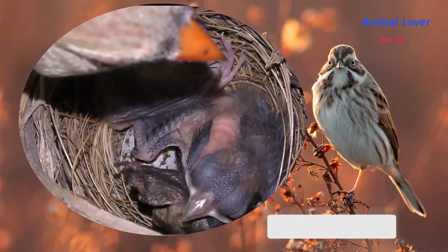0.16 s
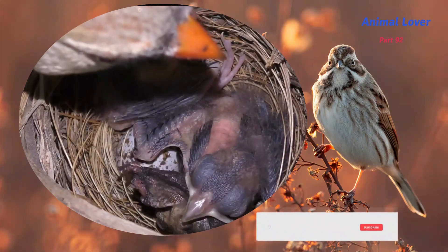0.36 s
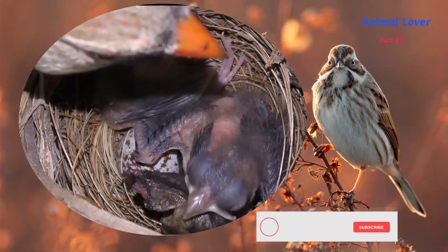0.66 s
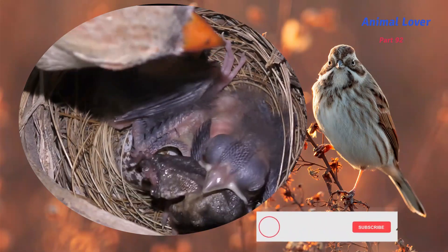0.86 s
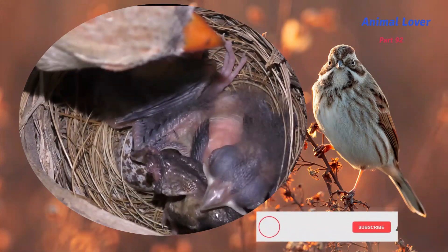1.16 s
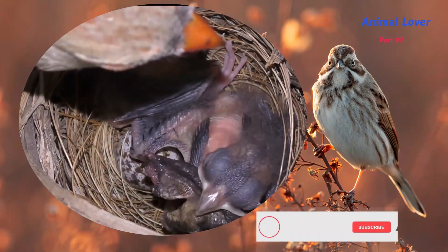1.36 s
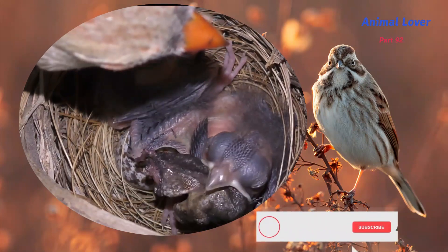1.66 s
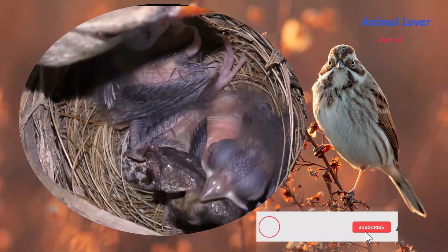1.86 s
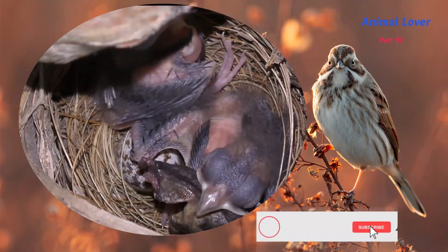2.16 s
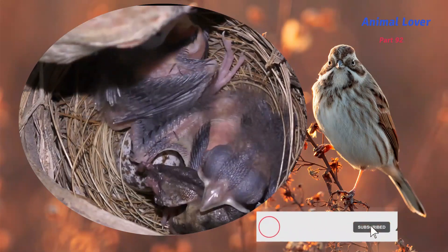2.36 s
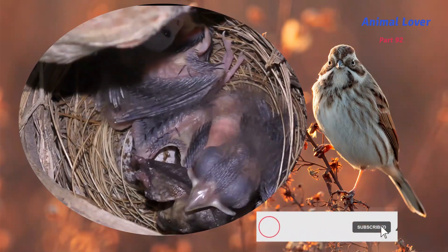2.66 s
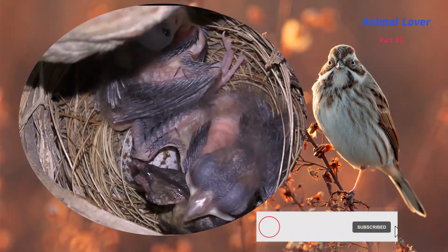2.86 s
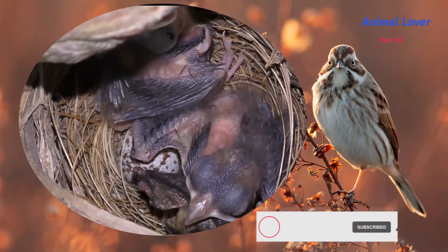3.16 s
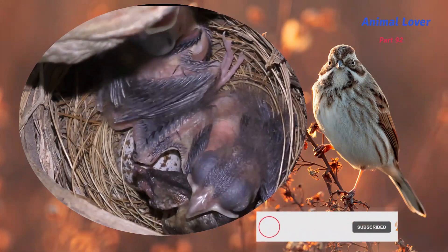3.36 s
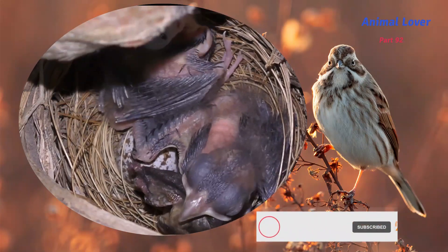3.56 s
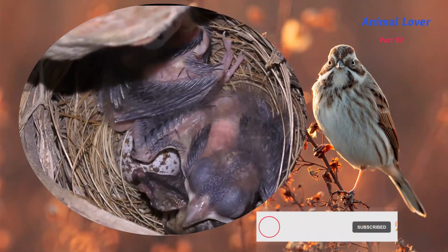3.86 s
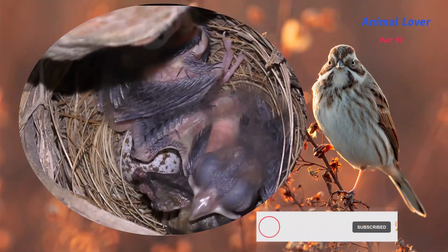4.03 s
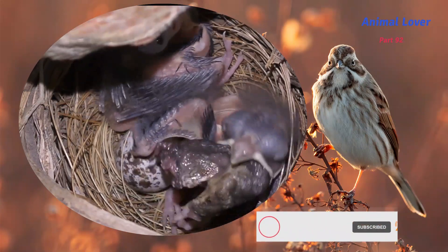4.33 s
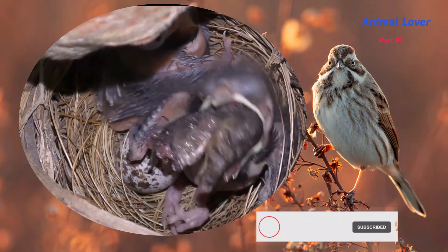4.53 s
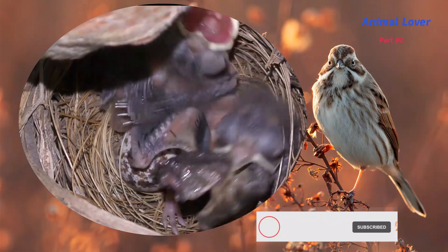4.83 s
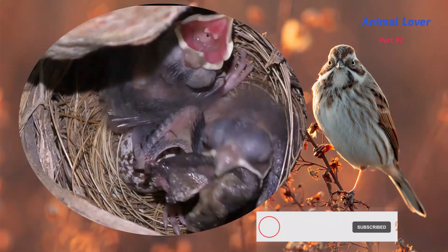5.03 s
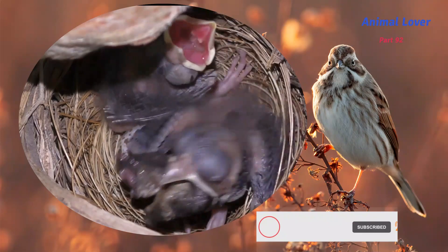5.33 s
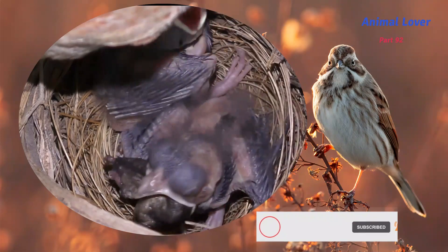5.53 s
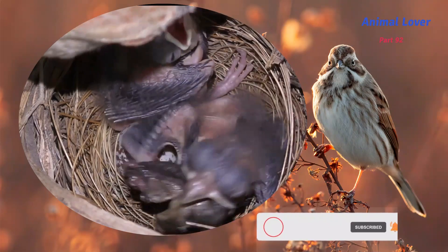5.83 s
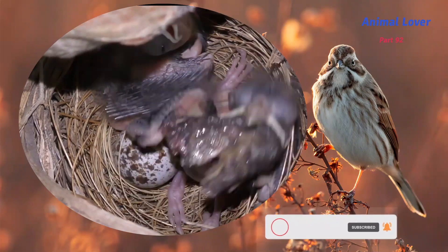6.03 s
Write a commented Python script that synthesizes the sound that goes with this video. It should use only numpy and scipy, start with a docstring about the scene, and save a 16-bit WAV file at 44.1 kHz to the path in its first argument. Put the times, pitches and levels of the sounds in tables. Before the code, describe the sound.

Nestlings beg close to the microphone in a straw nest outdoors. They give nine very high, thin squeaks: a group of three, then three quick pairs with pauses between. Some start with a tiny bill click and many end in a slight buzz. The straw rustles faintly. Behind them are a soft swelling low rumble, light hiss with faint machine whines and, late on, a distant bird's falling whistles.

```python
"""Nestlings beg close by in a nest under an overhang: nine thin whistles near 9 kHz, a group of three
and then three pairs. Some open with a click of the bill, and a second note from the other side of
the syrinx often makes their ends buzz. The straw rustles faintly. Behind them are a swelling low
rumble, outdoor air with faint machine whines, and a far bird's falling whistles.
An automatic gain control turns the mix down under each squeak."""
import sys
import numpy as np
from scipy import signal
from scipy.fft import rfft, irfft, next_fast_len
from scipy.io import wavfile
from scipy.ndimage import uniform_filter1d, map_coordinates

SR = 44100
rng = np.random.default_rng(int(sys.argv[2]) if len(sys.argv) > 2 else 0)


def transcribe(signal):
    """Save signal, clipped to [-1, 1], as a 16-bit WAV file at the path in sys.argv[1]."""
    frames = np.atleast_2d(signal).T
    limited = np.clip(frames, -1, 1)
    pcm = np.round(limited * 32767).astype(np.int16)
    wavfile.write(sys.argv[1], SR, pcm)


N = 272979


def amp(db):
    """Decibels to gain."""
    return 10 ** (np.asarray(db) / 20)


def unit(x):
    """The signal scaled to rms 1."""
    return x / np.sqrt(np.mean(x ** 2) + 1e-20)


def clock():
    """The time of every sample in seconds."""
    return np.arange(N) / SR


def along(points, hz):
    """A curve of (Hz, value) points, read on a log frequency axis."""
    freqs, values = np.transpose(points)
    return np.interp(np.log(hz + 1), np.log(freqs + 1), values)


def wobble(rate, size=N):
    """A smooth random curve with rate knots a second."""
    knots = rng.standard_normal(int(size * rate / SR) + 4)
    return map_coordinates(knots, [np.arange(size) * rate / SR])


def filtered(x, response):
    """The signal through an EQ, given as gain against frequency."""
    size = next_fast_len(x.shape[-1] + 8192)
    return irfft(rfft(x, size) * response(np.fft.rfftfreq(size, 1 / SR)), size)[..., :x.shape[-1]]


def tone(hz):
    """A sine of rms 1 that follows a pitch curve."""
    return np.sqrt(2) * np.sin(2 * np.pi * np.cumsum(hz) / SR)


def add(track, start, sound):
    """Mix a sound into a track at a start time in seconds."""
    part = track[max(round(start * SR), 0):][:len(sound)]
    part += sound[:len(part)]


def reverb(x, t60, spread):
    """A diffuse stereo tail; spread is the side-to-mid ratio."""
    t = np.arange(SR // 2) / SR
    tails = rng.standard_normal((2, len(t))) * amp(-60 * t / t60) * (1 - np.exp(-t / 0.0032))
    mid, side = signal.fftconvolve(x[None], tails / np.linalg.norm(tails[0]), axes=1)[:, :N]
    return np.array([mid + spread * side, mid - spread * side])


# Stereo image of the beds. Each row: frequency in Hz, left-right correlation from 0 to 1.
BED_CORRELATION = [(30, 0.7), (80, .98), (180, 0.92), (350, 0.88), (700, 0.79), (1400, .62), (2800, .34),
                   (6000, 0.42), (13000, .05)]


def noise_bed(spectrum):
    """Coloured stereo noise with a mid of rms 1: nearly mono in the bass, diffuse in the treble."""
    def colour(hz):
        width = np.arccos(np.clip(along(BED_CORRELATION, hz), -1, 1)) / 2
        return amp(along(spectrum, hz)) * np.array([np.cos(width), np.sin(width)])
    mid, side = filtered(rng.standard_normal((2, N)), colour)
    return np.array([mid + side, mid - side]) / np.std(mid)


# EQ of the rumble's three bands. Each row: frequency in Hz, relative level in dB.
DEEP_EQ = [(15, -30.5), (35, -25.5), (55, -17), (75, -9), (95, 1), (122, 2.5), (145, -5.5), (175, -18),
           (260, -37), (500, -89)]
MIDDLE_EQ = [(90, -35.5), (150, -7), (195, 1.5), (238, -0.5), (265, -14), (330, -36.5), (600, -78.5)]
UPPER_EQ = [(150, -34), (250, -8), (295, 0.5), (335, -2), (385, -8.5), (435, -7), (540, -18), (800, -34.5),
            (2000, -72)]
# Fader rides of the rumble. Each row: time in seconds, then deep, middle and upper level in dB.
RUMBLE_FADERS = [(0.0, -49, -58.5, -57), (0.5, -48, -51.5, -56), (0.85, -45.5, -51, -52.5),
                 (1.07, -45, -44, -54), (1.26, -45.5, -48.5, -54), (1.38, -48.5, -55, -53.5),
                 (1.56, -43.5, -50, -58), (1.85, -51.5, -54, -59), (2.25, -53, -56, -57.5),
                 (2.94, -51, -56, -57.5), (3.05, -44, -54, -54.5), (3.68, -48, -48.5, -56.5),
                 (3.92, -40.5, -47.5, -55), (4.13, -50, -48.5, -55), (4.42, -41, -43, -47),
                 (4.75, -50, -51, -53), (4.98, -45, -47, -52.5), (5.25, -47, -52, -57.5),
                 (5.58, -47.5, -51, -55), (5.75, -53, -58, -56), (6.19, -50.5, -55.5, -58.5)]


def rumble():
    """A hollow outdoor rumble in three broad bands, each swelling on its own fader."""
    times, *faders = np.transpose(RUMBLE_FADERS)
    bands = zip(faders, (DEEP_EQ, MIDDLE_EQ, UPPER_EQ))
    return sum(amp(np.interp(clock(), times, db)) * noise_bed(eq) for db, eq in bands)


# EQ of the outdoor hiss. Each row: frequency in Hz, relative level in dB.
AIR_EQ = [(200, -15.5), (550, 1), (900, -0.5), (1300, 2.5), (1800, -1), (2500, -5), (3500, -9.5),
          (5000, -15.5), (7000, -17.5), (11000, -19.5), (15500, -21)]
# Steady machine tones. Each row: pitch in Hz, level in dB.
MACHINE_TONES = [(293, -64.5), (1283, -72.5), (2567, -78.5)]


def air(hiss_db=-60.5, drift=.0015, flutter_db=2, wander_db=-0.02):
    """Soft outdoor hiss, with a distant machine whining in it."""
    whine = sum(amp(db + flutter_db * wobble(6)) * tone(hz * (1 + drift * wobble(12)))
                for hz, db in MACHINE_TONES)
    return amp(hiss_db + wander_db * wobble(3)) * noise_bed(AIR_EQ) + whine


def motor(start_s=4.79, spin_up_s=.15, start_hz=1480, full_hz=1826, db=-67.5, surge_db=6.5):
    """A second distant motor spins up, loudest and roughest while it gathers speed, then holds."""
    t = np.maximum(clock() - start_s, 0)
    hz = full_hz + (start_hz - full_hz) * np.exp(-t / spin_up_s)
    surge = np.exp(-((t - 0.12) / 0.085) ** 2)
    roughness = 0.05 + .03 * surge
    whine = tone(hz * (1 + roughness * wobble(300)))
    fade_in = np.minimum(t / .05, 1)
    return reverb(amp(db + surge_db * surge) * fade_in * whine, t60=0.14, spread=0.44)


# Distant slurred whistles. Each row: start and length in seconds, first and last pitch in Hz,
# level in dB ahead of the direct and reverb faders.
FAR_WHISTLES = [(4.21, .22, 3635, 2950, -72.5), (5.206, .33, 3900, 2534, -62.5)]


def far_bird(waver=.004, flutter_db=3, crest=0.38, slope_db=26, direct_db=-5, wet_db=-9):
    """Falling whistles that swell to a crest and fade, partly smeared by distance."""
    out = np.zeros(N)
    for start, length, start_hz, end_hz, db in FAR_WHISTLES:
        progress = np.linspace(0, 1, round(length * SR))
        hz = start_hz * (end_hz / start_hz) ** progress * (1 + waver * wobble(120, len(progress)))
        level = db - slope_db * np.abs(progress - crest) + flutter_db * wobble(45, len(progress))
        fades = np.sqrt(np.abs(np.sin(np.pi * progress)))
        add(out, start, amp(level) * fades * tone(hz))
    return amp(direct_db) * out + amp(wet_db) * reverb(out, t60=.22, spread=.7)


# Early reflections off the overhang. Each row: delay in seconds, gain in dB.
OVERHANG_ECHOES = [(.0052, -28), (0.011, -23), (0.0184, -29), (.031, -37.5)]


def overhang(x, left_db=1, left_lead_s=4.5e-6, short_db=-29, long_db=-37):
    """The nest's space: direct sound a little left of centre, weak echoes and two faint tails."""
    sides = np.array([[1], [-1]])
    direct = filtered(x, lambda hz: np.exp(1j * np.pi * hz * left_lead_s * sides))
    direct *= amp(left_db * sides / 2)
    echoes = sum(amp(db) * np.pad(x, (round(delay * SR), 0))[:N] for delay, db in OVERHANG_ECHOES)
    short_tail = amp(short_db) * reverb(x, t60=.09, spread=1.3)
    long_tail = amp(long_db) * reverb(x, t60=.29, spread=.9)
    return direct + echoes + short_tail + long_tail


# EQ of dry straw. Each row: frequency in Hz, relative level in dB.
STRAW_EQ = [(3000, -35), (6000, -11.5), (9000, 0), (11500, -1), (15500, -3.5)]


def rustle(db=-74.5, grain_db=3, stir_db=1.5):
    """The chicks stir in the dry straw: a faint, fine crackle."""
    crackle = rng.standard_normal(N) * amp(grain_db * wobble(500) + stir_db * wobble(11))
    return amp(db) * unit(filtered(crackle, lambda hz: amp(along(STRAW_EQ, hz))))


# EQ of a click's dry tick. Each row: frequency in Hz, relative level in dB.
TICK_EQ = [(1900, -39.5), (2750, 2.5), (4200, 0), (6200, -4.5), (9000, -7), (15000, -22)]
# Bill and straw clicks. Each row: start in seconds, time to decay by 60 dB in seconds, tick level
# in dB, snap level in dB, snap centre in Hz, snap width in octaves.
BILL_AND_STRAW_CLICKS = [(1.020, 0.069, -61.5, -54.5, 10990, .55), (1.306, .018, -61, -56, 10010, .45),
                         (1.307, 0.045, -71, -44, 9980, .08), (1.331, 0.053, -65.5, -53, 11300, .09),
                         (1.340, 0.022, -56, -56.5, 7000, .25), (1.503, .06, -78.5, -62, 11140, .14),
                         (1.908, 0.041, -59.5, -68, 8000, .5), (1.920, .1, -68, -65.5, 11000, .4),
                         (2.025, 0.074, -71.5, -63.5, 8300, .09), (2.446, .035, -57, -56.5, 11000, .45),
                         (2.468, 0.028, -58.5, -56, 8550, .3), (3.535, 0.02, -53, -50, 12960, .6),
                         (3.544, 0.021, -57.5, -58.5, 6000, .2), (4.022, .05, -74, -64, 10900, .13),
                         (4.408, .06, -64, -64.5, 13060, .4), (4.448, .04, -58.5, -64.5, 12530, .3),
                         (4.456, 0.026, -55.5, -62, 12870, .3), (4.621, 0.0397, -48.5, -50, 12030, .5),
                         (4.631, .025, -56, -67, 6000, .3)]


def clicks(attack_s=0.00068, crackle_db=3):
    """Crackly bursts as a bill parts or a straw shifts: a dry tick with no body and a bright snap."""
    out, t = np.zeros(N), np.arange(SR // 6) / SR
    for start, t60, tick_db, snap_db, centre_hz, octaves in BILL_AND_STRAW_CLICKS:
        tick = filtered(rng.standard_normal(len(t)), lambda hz: amp(along(TICK_EQ, hz)))
        snap_band = lambda hz: np.exp(-.5 * (np.log2((hz + 1) / centre_hz) / octaves) ** 2)
        snap = filtered(rng.standard_normal(len(t)), snap_band)
        burst = amp(tick_db) * unit(tick) + amp(snap_db) * unit(snap)
        add(out, start, burst * amp(-60 * t / t60) * (1 - np.exp(-t / attack_s)))
    return out * amp(crackle_db * wobble(600))


def whistle(hz, db, rasp, edge_s=0.0045, quiver=.0009):
    """One pure note along a pitch and a level curve; the tiny membrane trembles a little."""
    t = np.arange(len(hz)) / SR
    tremble = 1 + quiver * wobble(130, len(t)) + rasp * wobble(1200, len(t))
    gate = np.clip(np.minimum(t, t[-1] - t) / edge_s, 0, 1)
    return amp(db) * np.sin(gate * np.pi / 2) ** 2 * tone(hz * tremble)


# Second notes, at the close of each squeak and early in some.
# Each row: start and length in seconds, opening pitch in Hz, level in dB.
SIDE_NOTES = [(0.777, .016, 9420, -29), (1.017, 0.037, 9370, -32), (1.126, 0.02, 9540, -24.5),
              (1.304, .016, 9650, -31), (1.332, 0.0076, 9200, -27.5), (2.321, 0.021, 9460, -26.5),
              (2.52, 0.0086, 9420, -34.5), (3.434, 0.029, 9570, -28), (3.534, 0.0093, 10400, -36.5),
              (3.599, 0.018, 9250, -25), (4.46, 0.023, 9260, -36), (4.487, .030, 9140, -36),
              (4.520, 0.034, 9380, -27.5), (4.617, .011, 9550, -29), (4.691, 0.017, 9420, -25.5)]


def side_notes(sag_hz=179.8, fade_db=-6.5):
    """The other side of the syrinx sings short, nearly level notes that sag and fade."""
    out = np.zeros(N)
    for start, length, hz, db in SIDE_NOTES:
        progress = np.linspace(0, 1, round(length * SR))
        add(out, start, whistle(hz - sag_hz * progress, db + fade_db * progress, rasp=0.012))
    return out


def squeak_pitch(t, rise, fall, dip_place, first_hz, dip_hz, second_hz, end_hz,
                 scoop_hz_per_s=33000, dip_flatness=3.5, drop_bend=1.85):
    """The pitch scoops up to a crest, eases through a dip to a second crest, drops and levels off."""
    fall_start = t[-1] - fall
    dip_time = rise + dip_place * (fall_start - rise)
    from_dip = np.interp(t, [rise, dip_time, fall_start], [-1, 0, 1])
    crest_hz = np.where(from_dip < 0, first_hz, second_hz)
    middle = dip_hz + (crest_hz - dip_hz) * np.abs(np.sin(from_dip * np.pi / 2)) ** dip_flatness
    scoop = scoop_hz_per_s * rise * np.maximum(1 - t / rise, 0) ** 2
    falling = np.maximum((t - fall_start) / fall, 0) ** drop_bend
    drop = (second_hz - end_hz) * np.sin(np.pi / 2 * falling) ** 2
    return middle - scoop - drop


def squeak_envelope(t, opening_db, full_from, full_to,
                    onset_db=-30, closing_db=-8, end_db=-20, step_s=0.0067):
    """Level in dB: a soft swell, a quick step up to full voice, a step down and a fading close."""
    before, after = np.maximum(full_from - t, 0), np.maximum(t - full_to, 0)
    swell = (onset_db - opening_db) * (before / full_from) ** 2
    step_up = opening_db * np.minimum(before / step_s, 1)
    step_down = closing_db * np.minimum(after / step_s, 1)
    fade = (end_db - closing_db) * (after / (after[-1] + 1e-9)) ** 3.2
    return swell + step_up + step_down + fade


# The begging squeaks. Each row: start, length, rise and fall in seconds, place of the dip between
# the crests from 0 to 1, pitch of first crest, dip, second crest and end in Hz, level in dB,
# opening in dB relative to full voice, start and end of full voice as shares of the length.
BEGGING_SQUEAKS = [ (0.682, 0.11, .036, .036, 0.3, 9320, 9440, 9720, 8330, -17, -4, .5, .82),
                   (1.016, .129, .026, .031, 0.2, 9190, 9175, 9525, 8400, -18.5, -4, 0.56, .86),
                   (1.255, 0.086, .017, .017, .6, 9690, 8810, 8950, 8080, -21, -3.5, 0.65, 1),
                   (2.225, 0.12, 0.036, 0.048, .2, 9346, 9130, 9285, 8370, -20, -3, 0.64, .77),
                   (2.442, .087, .008, .026, 0.7, 10010, 9280, 9425, 8600, -15.5, -5, 0.66, .77),
                   (3.342, 0.13, .025, 0.03, .45, 9095, 8825, 9510, 8330, -14.5, -4, 0.45, .55),
                   (3.533, 0.08, .020, 0.039, .5, 9630, 9340, 9450, 8620, -16.5, -2.5, 0.38, 0.8),
                   (4.442, 0.12, 0.018, .036, 0.7, 8990, 8780, 9060, 8430, -16, -5, 0.39, .6),
                   (4.619, .093, 0.026, 0.034, .45, 9480, 9250, 9280, 8510, -22.5, -1, 0.25, .88)]
# The voice catches as it steps into or out of full voice. Each entry: time in seconds.
VOICE_CATCHES = [0.731, 0.7365, 0.776, 1.079, 2.514, 3.415, 3.557, 4.470, 4.627]


def nestlings(catch_db=-11.5, catch_s=.0015, shimmer_db=1.02):
    """Each squeak arches up and drops away; where both sides of the syrinx sound, they beat and buzz."""
    voice = np.zeros(N)
    for start, length, *contour, db, opening_db, full_from, full_to in BEGGING_SQUEAKS:
        t = np.arange(round(length * SR)) / SR
        level = db + squeak_envelope(t, opening_db, full_from * length, full_to * length)
        add(voice, start, whistle(squeak_pitch(t, *contour), level, rasp=0.00069))
    voice += side_notes()
    catches = sum(np.exp(-((clock() - at) / catch_s) ** 2) for at in VOICE_CATCHES)
    return voice * amp(catch_db * catches + shimmer_db * wobble(150))


def scene():
    """The nest in front, the outdoors behind."""
    nest = overhang(nestlings() + clicks() + rustle())
    return nest + far_bird() + rumble() + air() + motor()


def record(dry):
    """A gain control ducks the whole mix under each squeak; a steep low-pass cuts the very top."""
    threshold_db, share_removed, reaction_s, top_hz = -30, .25, 0.0086, 15800
    power = np.abs(uniform_filter1d(np.mean(dry ** 2, axis=0), size=661))  # 15 ms window
    excess_db = np.maximum(10 * np.log10(power + 1e-12) - threshold_db, 0)
    pole = np.exp(-1 / (reaction_s * SR))
    duck_db = signal.lfilter([1 - pole], [1, -pole], share_removed * excess_db)
    return filtered(dry * amp(-duck_db), lambda hz: hz < top_hz)


dry = scene()
out = record(dry)
transcribe(out)
```